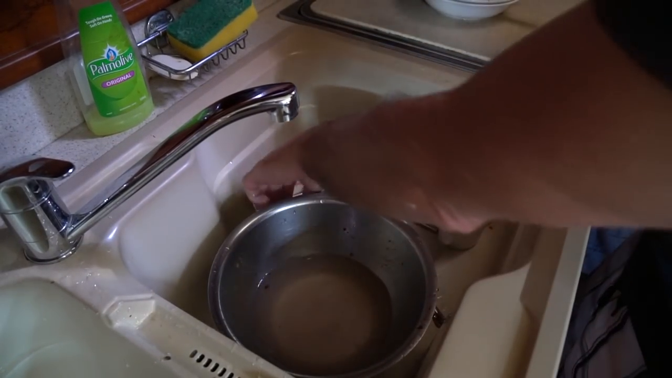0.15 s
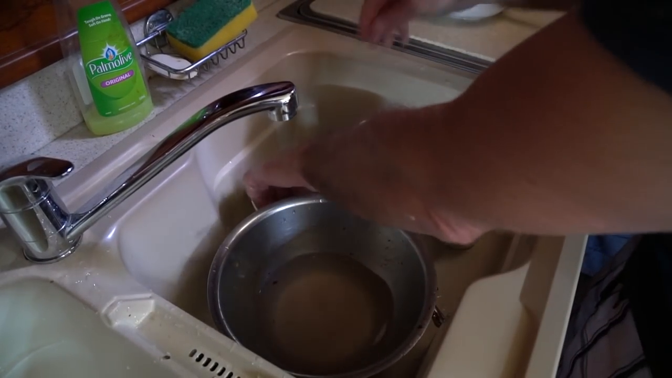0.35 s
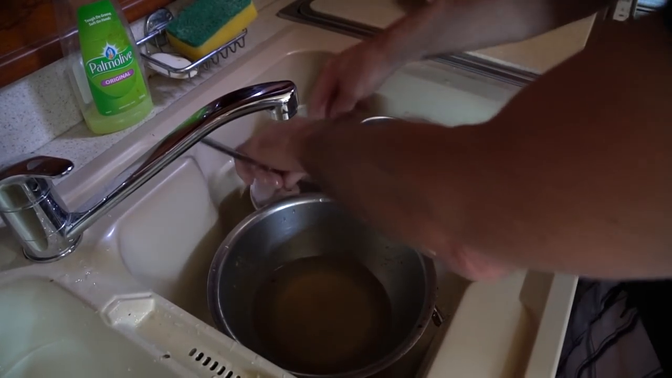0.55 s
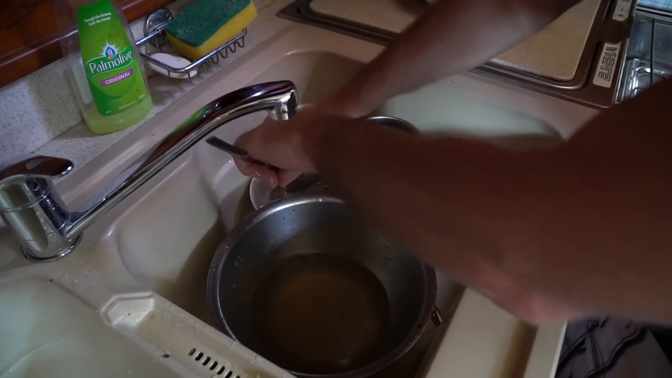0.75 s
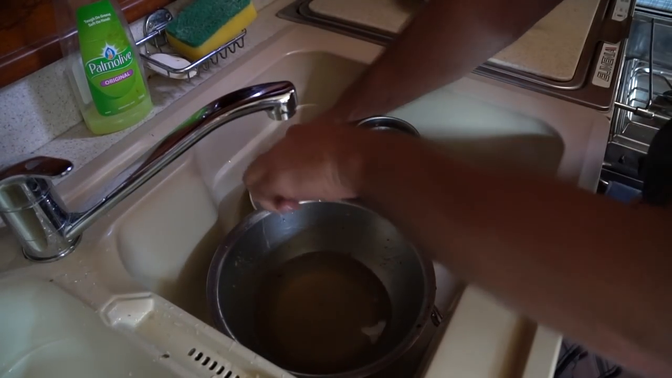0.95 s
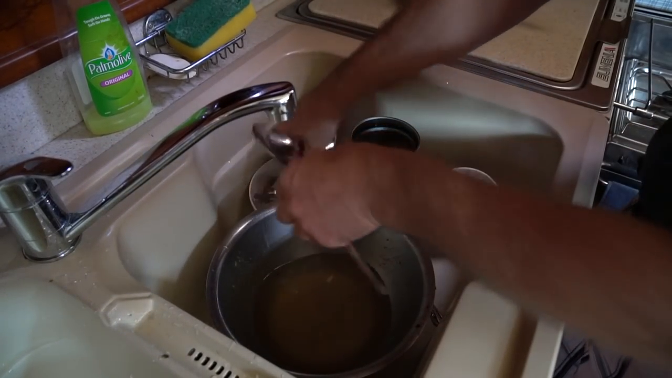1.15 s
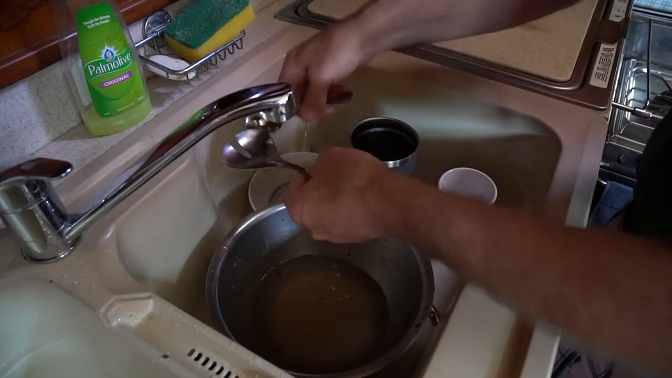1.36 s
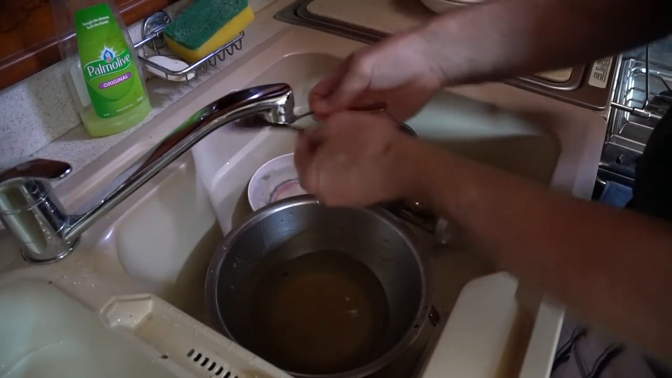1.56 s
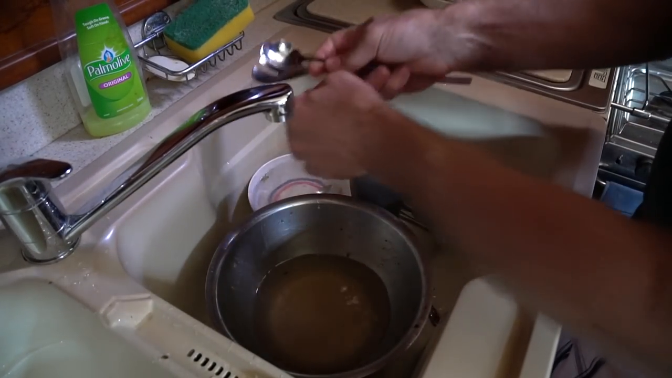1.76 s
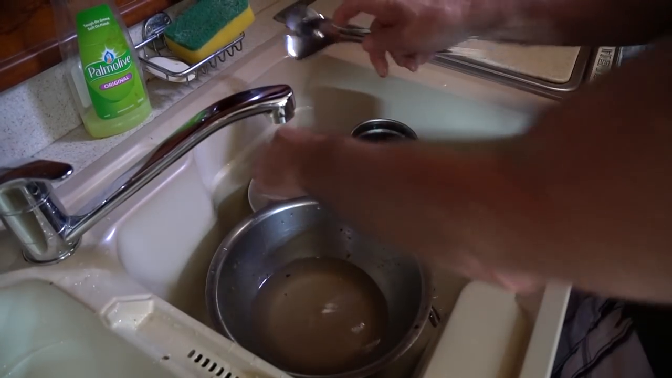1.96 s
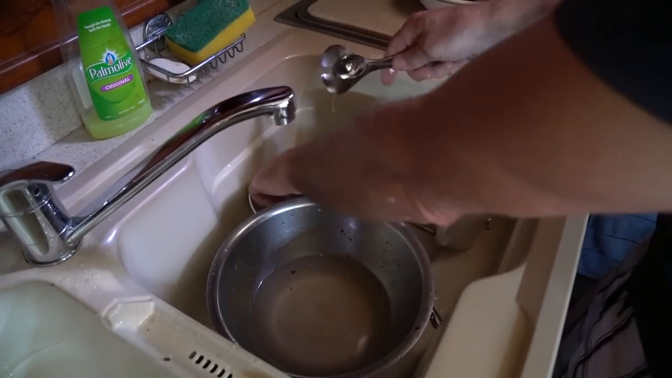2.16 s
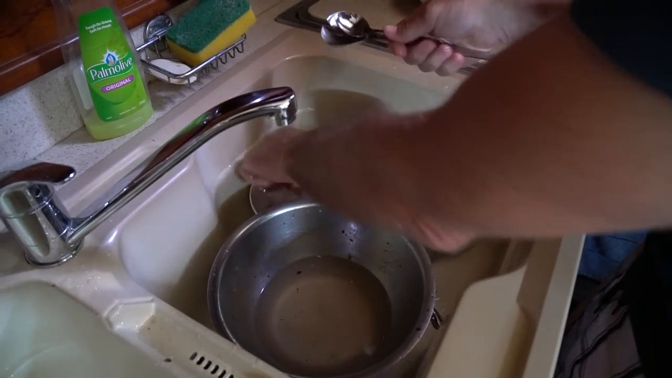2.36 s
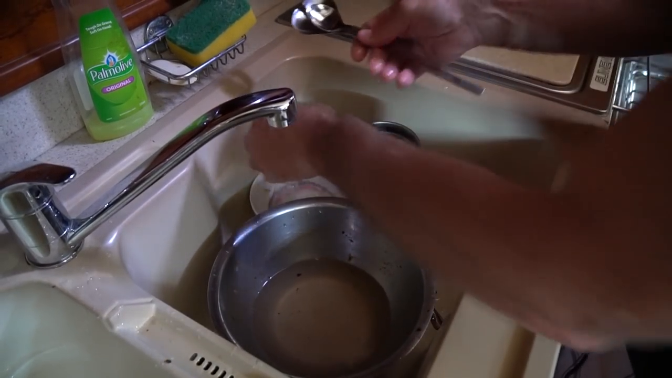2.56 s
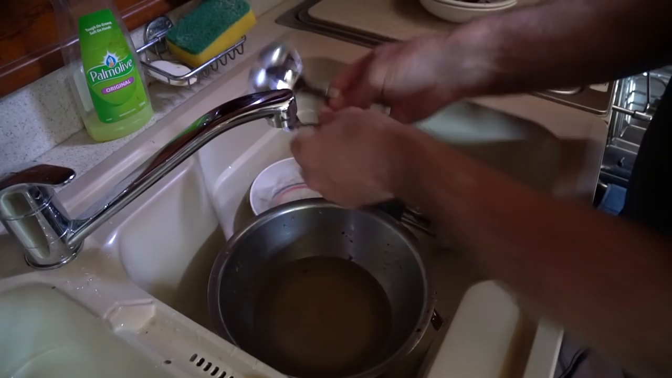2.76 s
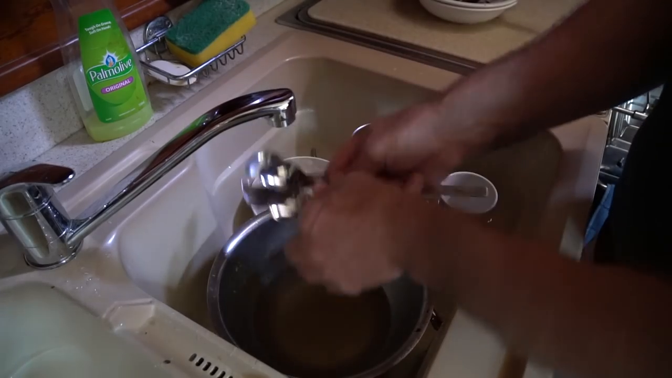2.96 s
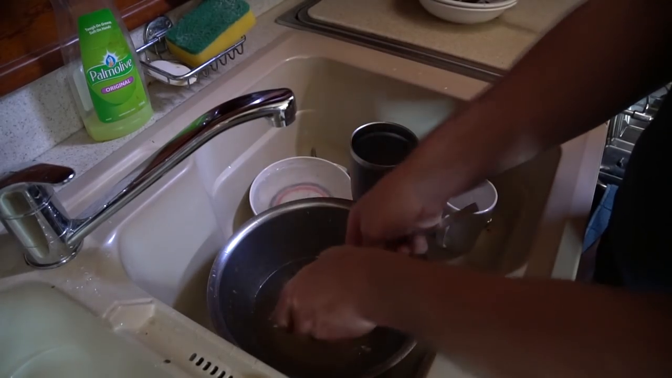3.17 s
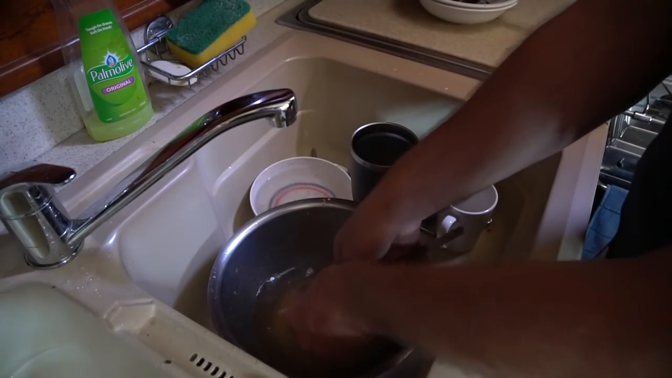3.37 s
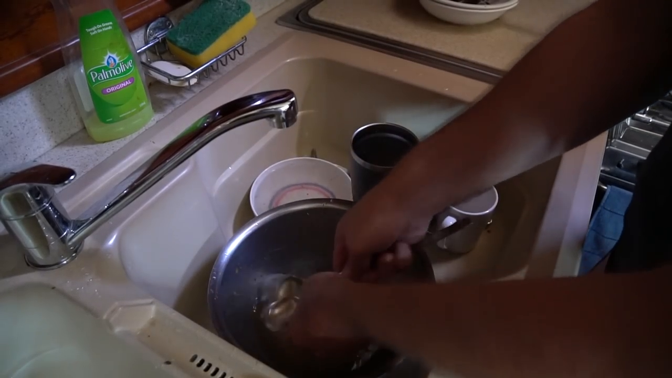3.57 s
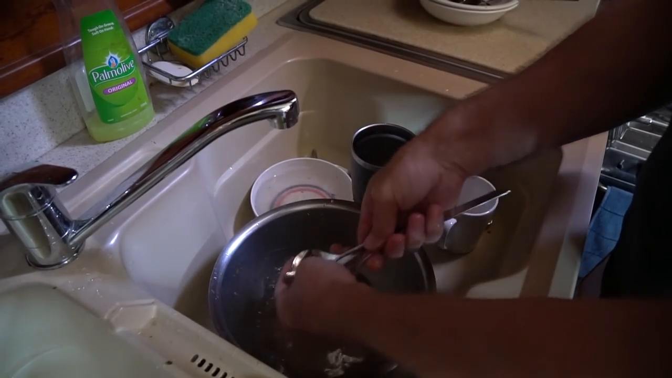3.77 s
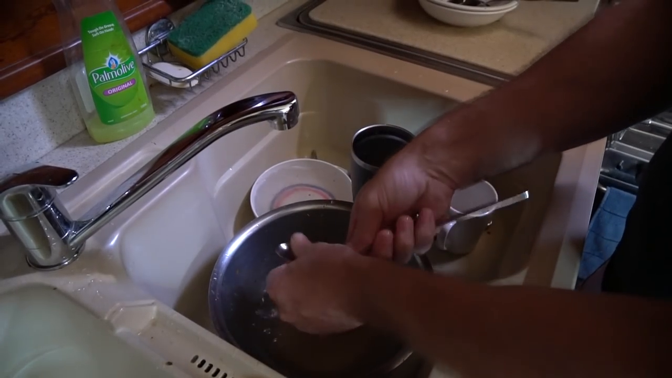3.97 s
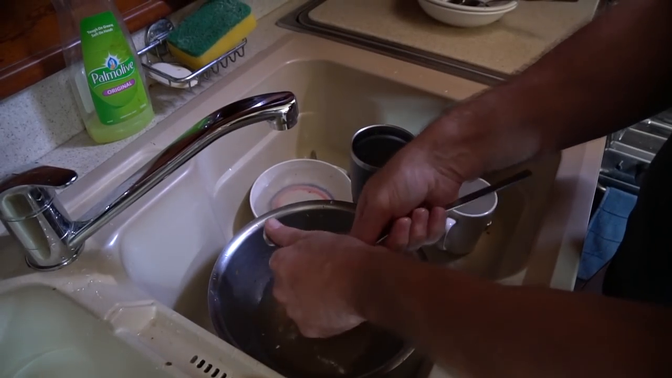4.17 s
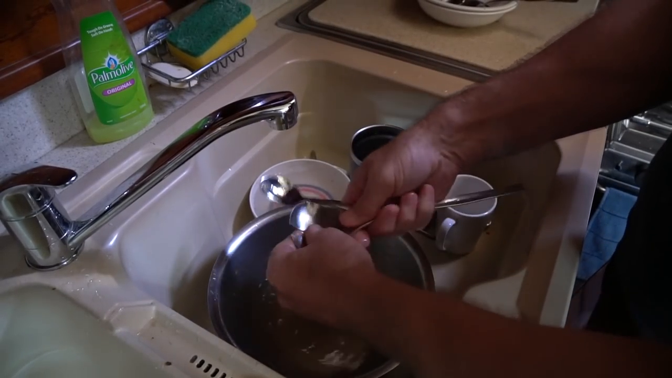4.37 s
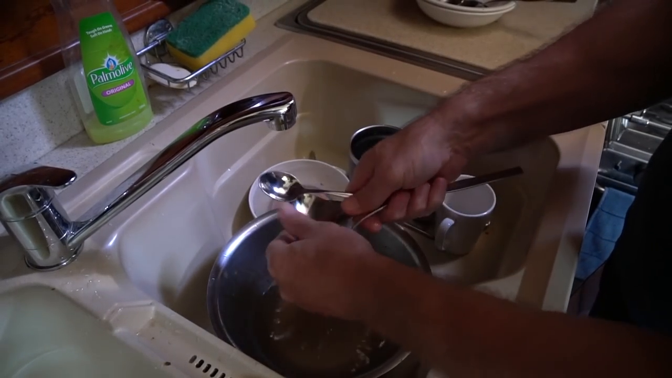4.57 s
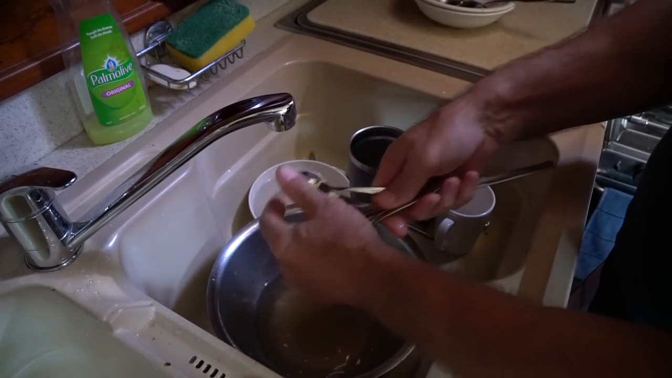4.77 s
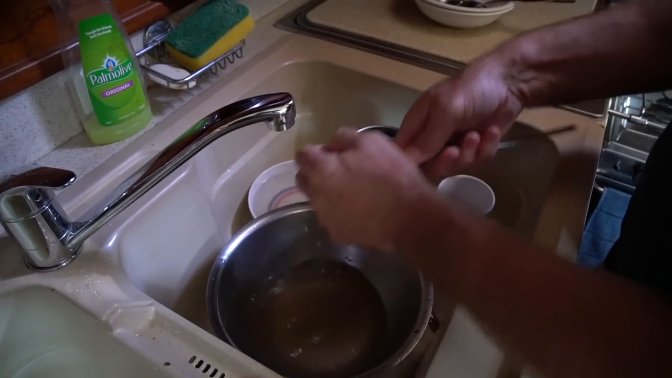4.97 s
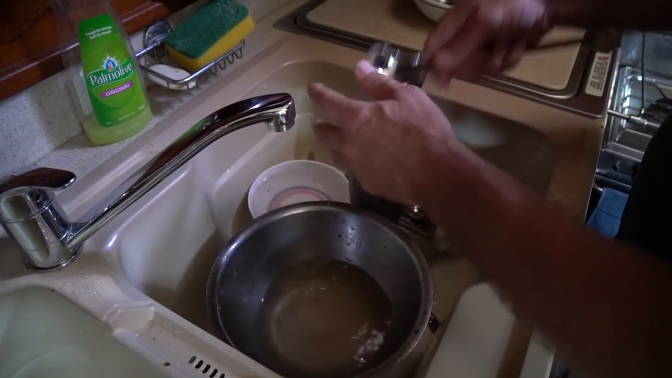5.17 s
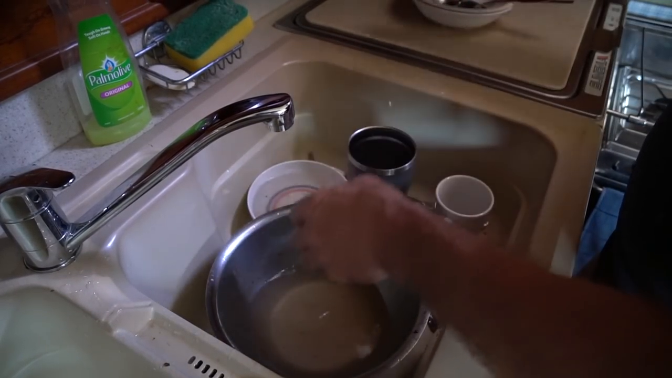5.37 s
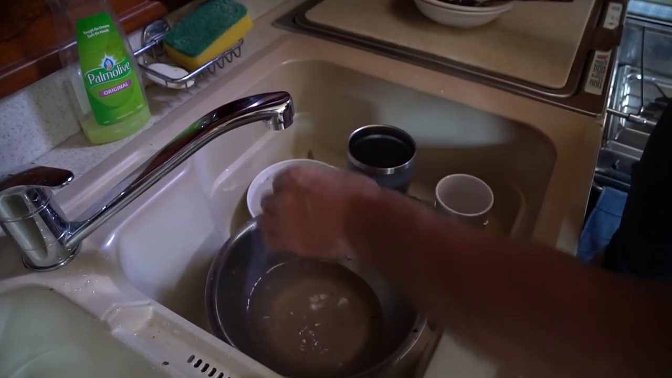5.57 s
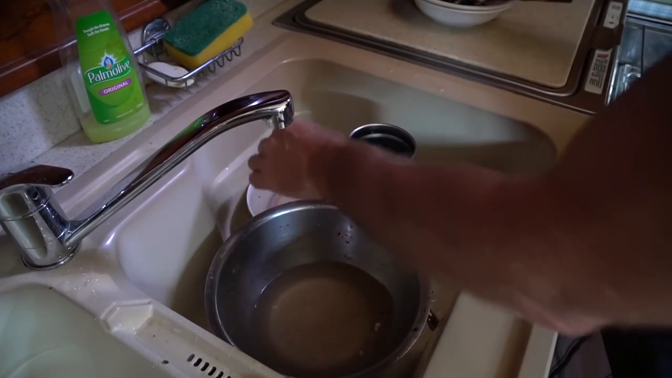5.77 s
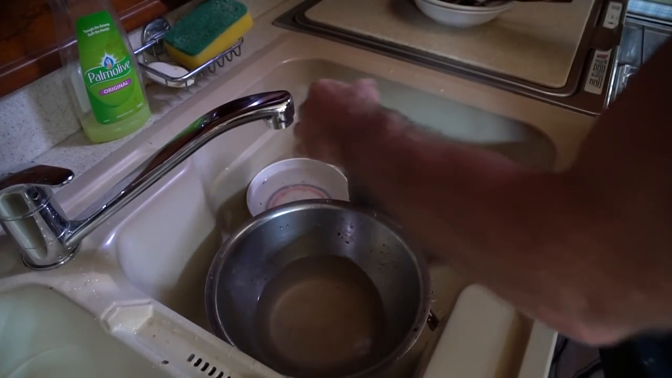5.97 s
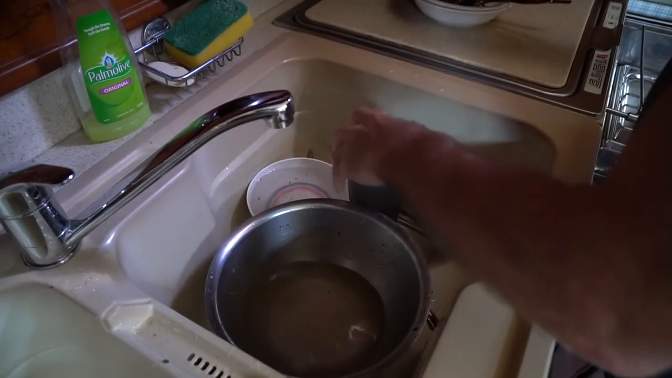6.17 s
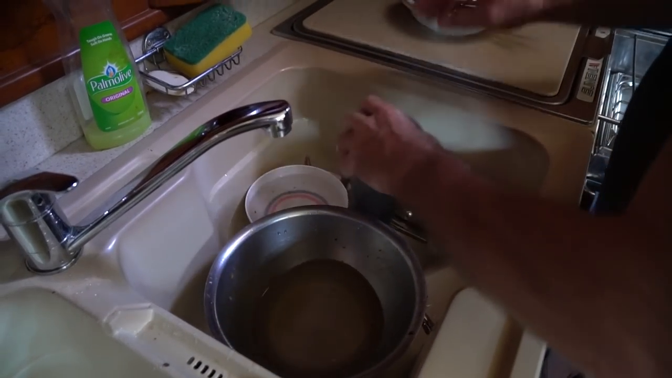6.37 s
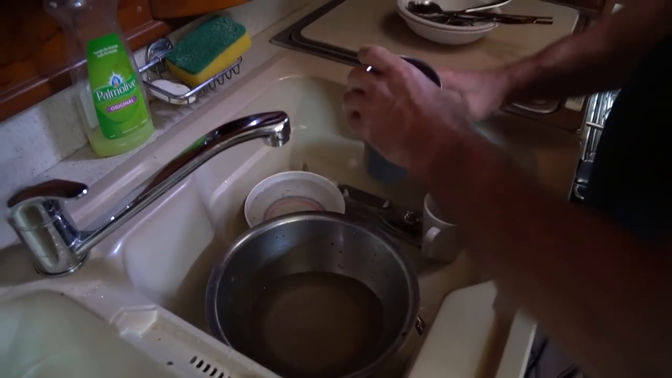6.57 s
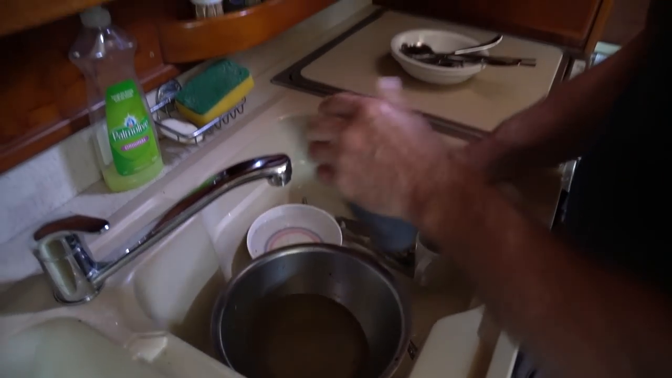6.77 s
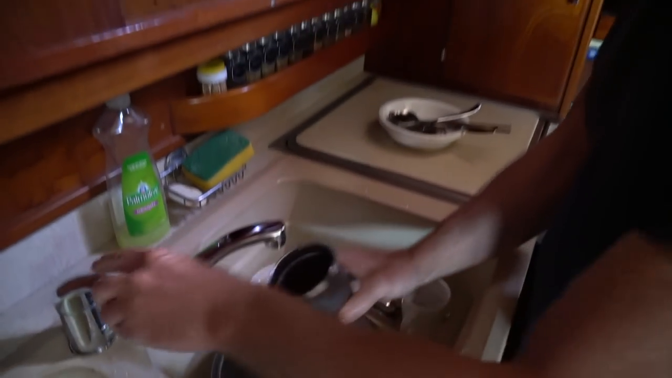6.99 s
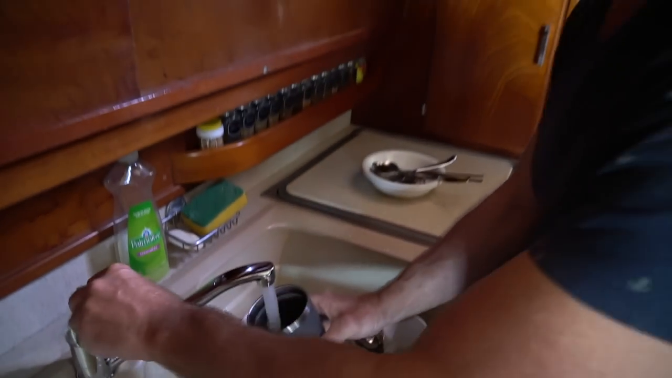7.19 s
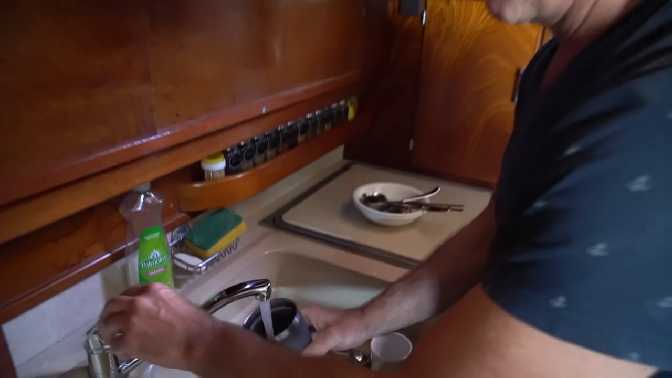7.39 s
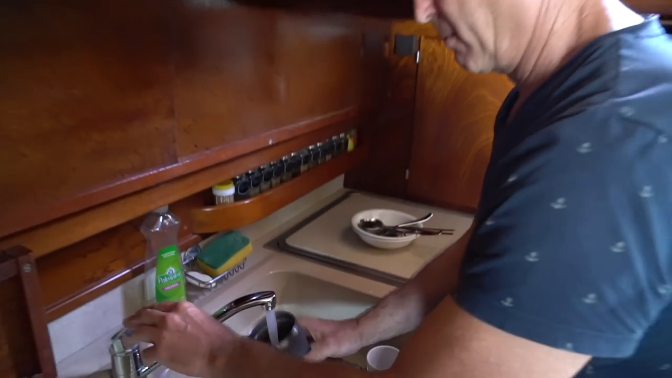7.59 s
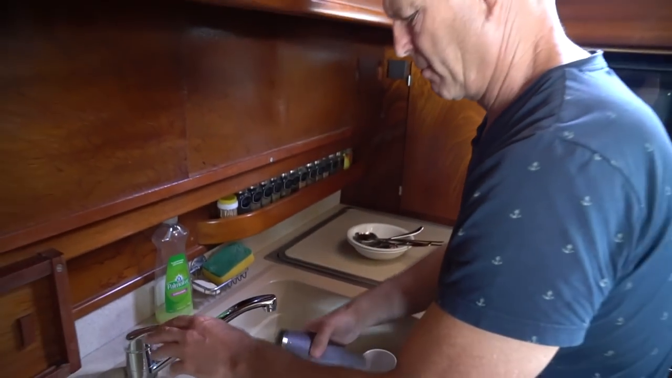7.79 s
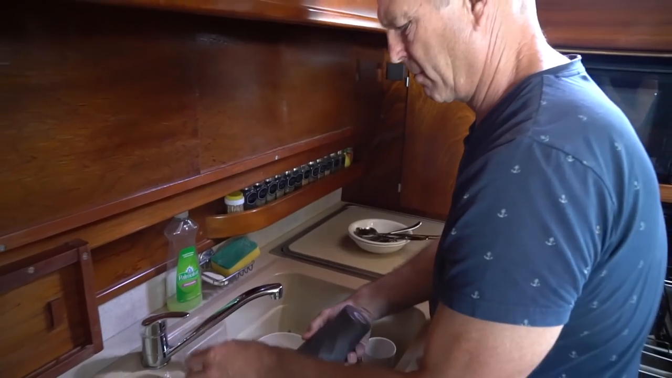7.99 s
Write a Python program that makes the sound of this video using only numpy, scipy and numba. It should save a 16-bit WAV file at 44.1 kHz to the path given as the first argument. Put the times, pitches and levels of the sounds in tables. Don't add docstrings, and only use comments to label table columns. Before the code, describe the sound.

Washing up heard close in stereo over a faint cabin hum. Dull, loud china clacks come first, then sparse high metallic spoon clinks with tiny drips. A short bubbling slosh follows, more wet spoon taps, and a dense clattering slide as cutlery lands on a pile. A mug gives a clear ring, cut off by a hand. After a quiet gap, water runs under a second and stops. Short dry wooden-room echo.

```python
import sys
import numpy as np
from scipy import signal
from scipy.fft import rfft, irfft, next_fast_len
from scipy.io import wavfile
from scipy.ndimage import uniform_filter1d
from numba import njit

SR = 44100
rng = np.random.default_rng(int(sys.argv[2]) if len(sys.argv) > 2 else 0)


def gain_from_db(level_db):
    decades = np.asarray(level_db, float) / 20
    return 10 ** decades


def store_wav(level_fs):
    pcm = np.round(np.clip(np.atleast_2d(level_fs), -1, 1) * 32767)
    wavfile.write(sys.argv[1], SR, pcm.T.astype(np.int16))


N = 354194
T = np.arange(N) / SR

# (lowest [Hz], highest [Hz])
EDGES_HZ = [(4000, 11800), (1600, 4000), (200, 1600)]
# (frequency [Hz], level [dB], t60 [s])
SPOON_MODES = [(2350, -14, .25), (2650, -10, .2), (3300, -10, .12), (3660, -8, .16), (4300, -8, .17),
               (5130, -12, .2), (5400, -12, .15), (6070, -11, .22), (6470, -6, .12), (7050, -8, .22),
               (7235, -7, .2), (7770, 0, .16), (8059, -6, .24), (8930, -11, .25), (9200, -3, .22),
               (9880, -8, .1), (10330, -3, .24), (10460, -6, .28), (11000, -5, .16)]
# (frequency [Hz], level [dB per Hz])
CRACK_COLOUR = [(320, -7.5), (450, -12), (720, -9), (1110, -8), (1310, -12.5), (10600, -9), (11500, -20)]


def unit(x):
    return x / np.sqrt(np.mean(x ** 2))


def colour(x, points):
    hz, db = np.transpose(points)
    size = next_fast_len(x.shape[-1])
    f = np.maximum(np.arange(size // 2 + 1) * SR / size, 1)
    gain = gain_from_db(np.interp(np.log(f), np.log(hz), db))
    return irfft(rfft(x, size) * gain, size)[..., :x.shape[-1]]


def wide_noise(points, size=N):
    # (frequency [Hz], level [dB])
    side_db = [(60, -12), (250, -10), (1000, -7.5), (2000, -5.5), (4000, -3), (10000, -2.5)]
    mid, side = colour(rng.standard_normal((2, size)), points)
    side = colour(side, side_db)
    return unit(np.array([mid + side, mid - side]))


def ring(x, hz, t60):
    r = np.exp(-np.log(1000) / (np.clip(t60, .01, .9) * SR))
    w = 2 * np.pi * hz / SR
    return signal.lfilter([0, r * np.sin(w)], [1, -2 * r * np.cos(w), r * r], x)


def cabin():
    # (frequency [Hz], level [dB per Hz])
    air = [(15, -43), (25, -9), (114, -15), (265, -22.5), (325, -27.5), (3110, -45), (4810, -41.5),
           (10600, -48), (11500, -56.5), (15000, -105)]
    hum = unit(ring(rng.standard_normal(N), 103, 0.25))
    return gain_from_db(-65) * wide_noise(air) + gain_from_db(-59) * hum


def struck(hits, bass_db, slope):
    return [(s, db, weight, bass_db + slope * weight, t60) for s, db, weight, t60 in hits]


def rubbed(curve, middle_db, bass_db, middle_slope, bass_slope):
    return [(s, db, middle_db + middle_slope * (db + 43), bass_db + bass_slope * (db + 43.5))
            for s, db in curve]


def band_db(rows):
    return rows[:, 1] + np.array([0 * rows[:, 1], rows[:, 2], rows[:, 3]])


def rub_gain(rub, t):
    rows = np.array(rub)
    return np.array([gain_from_db(np.interp(t, rows[:, 0], db, -140, -140)) for db in band_db(rows)])


def grit(size, rate, spread_db, t60):
    strength = gain_from_db(spread_db * np.minimum(rng.exponential(size=size), 3))
    blows = (rng.random(size) < rate / SR) * strength
    flicker = signal.lfilter([1], [1, -np.exp(-np.log(1000) / (t60 * SR))], blows)
    return unit(blows) * np.sign(rng.standard_normal(size)), unit(flicker)


def patchy(x):
    z = signal.stft(x, nperseg=512)[2]
    patch_hz, patch_s = 260, .045
    walk = rng.standard_normal(z.shape[1:])
    walk = uniform_filter1d(walk, int(patch_hz * 512 / SR), axis=0)
    walk = uniform_filter1d(walk, int(patch_s * SR / 256), axis=1)
    return signal.istft(z * gain_from_db(3.5 * unit(walk)), nperseg=512)[1][:, :x.shape[1]]


def three_bands(points, modes, size):
    lifts = [(hz * (1 + k * 0.028), (6 + 0.082 * db) * (k == 0)) for hz, db, _ in modes for k in (-1, 0, 1)]
    hiss = colour(wide_noise(points, size), sorted(lifts) or [(1, 0)])
    if modes:
        hiss = patchy(hiss)
    filters = [signal.butter(4, edges, "band", fs=SR, output="sos") for edges in EDGES_HZ]
    return np.array([unit(signal.sosfilt(sos, hiss)) for sos in filters])


@njit
def add(out, at, hz, t60, size):
    for k in range(len(at)):
        z, p = size[k] + 0j, np.exp(2j * np.pi * hz[k] / SR - np.log(1000) / (t60[k] * SR))
        for i in range(at[k], min(len(out), at[k] + int(t60[k] * SR))):
            out[i] += z.imag
            z *= p


def nearest(free_hz, own_hz):
    near = own_hz[np.abs(np.log(free_hz[:, None] / own_hz)).argmin(axis=1)]
    return np.where(np.abs(np.log(free_hz / near)) < .07, near * (free_hz / near) ** .15, free_hz)


def handled(hits, rub, modes, noise, crack_db, clink_db, ring_db, rub_db, sing_db, rise_s, free,
            held_s=9., place_db=4.0):
    rows, (hz, db, t60) = np.array(hits), np.transpose(modes)
    first = int(SR * min(rub[0][0], hits[0][0])) - SR // 100
    last = int(SR * max(rub[-1][0], hits[-1][0])) + SR // 3
    now, t = T[first:last], T[:SR // 3]
    at = (rows[:, 0] * SR).astype(int) - first
    gain, slide = gain_from_db(band_db(rows)), rub_gain(rub, now)
    crack_t60, t60 = np.clip(rows[:, 4], .01, .4), np.clip(free * t60, .02, .9)

    blows, flicker = grit(len(now), 500, 3.0, .05)
    envelope = gain_from_db(rub_db) * slide * flicker
    for i, g, fall in zip(at, gain.T, crack_t60):
        crack = (1 - np.exp(-t / rise_s)) * gain_from_db(-60 * t / fall)
        envelope[:, i:i + len(t)] += gain_from_db(crack_db) * g[:, None] * crack

    band = (hz < EDGES_HZ[0][0]) * 1 + (hz < EDGES_HZ[1][0])
    place = rng.standard_normal((len(at), 2, len(hz)))
    size = gain_from_db(ring_db + db + place_db * place[:, 0]) * gain[band].T
    mode_hz = hz * (1 + 0.0027 * place[:, 1])
    tones = np.zeros(len(now))
    add(tones, at.repeat(len(hz)), mode_hz.ravel(), np.tile(t60, len(at)), size.ravel())
    for f, d, fall, b in zip(hz, db, t60, band):
        tones += gain_from_db(sing_db + d) * ring(slide[b] * blows + 1e-12, f, fall)
    tones *= np.clip((held_s - now) / 0.024, 0, 1)

    for (lo, hi), g in zip(EDGES_HZ, gain):
        u = rng.random((len(at), 4, 16))
        start = at[:, None] + (.014 * SR * u[:, 3]).astype(int)
        size = gain_from_db(clink_db - 26 * u[:, 2]) * g[:, None]
        lowest = max(lo, 520)
        clink_hz = nearest(lowest * (hi / lowest) ** u[:, 0].ravel(), hz)
        clink_t60 = crack_t60[:, None] * (0.3 + 0.55 * u[:, 1])
        add(tones, start.ravel(), clink_hz, clink_t60.ravel(), size.ravel())

    out = np.zeros((2, N))
    out[:, first:last] = (noise[..., :len(now)] * envelope[:, None]).sum(axis=0) + tones
    return out


def china():
    # (time [s], treble peak [dB], weight = middle over treble [dB], crack t60 [s])
    hits = [(0.1131, -31, -17.5, 0.11), (0.1556, -11.5, 2, 0.12), (0.2401, -16, 2.5, 0.17),
            (0.3071, -8.5, -31, 0.1), (0.3251, -8.5, -3.5, 0.038), (0.411, -29, -16, 0.11),
            (0.451, -7, -6.5, 0.24), (0.5334, -6, -14, 0.28), (0.616, -13, -31, 0.19),
            (0.6374, -17, -26, 0.13), (0.7123, -24, 7, 0.16), (0.964, -24, 4.5, 0.1),
            (1.0226, -20, -11.5, 0.48), (1.096, -9, -7.5, 0.15), (1.1418, -9.5, -21, 0.058),
            (1.1692, -12, 6.5, 0.033), (1.2208, 0.5, -5.5, 0.051), (1.274, -14.5, 5, 0.18),
            (1.2994, -9, 5, 0.018)]
    # (time [s], level [dB])
    rub = [(.11, -41.5), (.45, -42), (0.637, -35), (0.851, -75), (.955, -78), (1.05, -44.5), (1.29, -28.5),
           (1.39, -50), (1.56, -72)]
    # (frequency [Hz], level [dB], t60 [s])
    modes = [(255, -28.5, 0.24), (350, -11, 0.13), (557, -15, 0.2), (628, -5, 0.13), (714, 0, 0.15),
             (904, -4, 0.12), (1033, -4, 0.082), (1191, -3, 0.083), (1361, -5, 0.1), (1543, 0, 0.05),
             (2423, -15, 0.3), (2990, -15, 0.4), (3160, -3, 0.08), (3250, -14.5, 0.4), (3650, -6.5, 0.06),
             (3930, -18, 0.4), (4400, -9.5, 0.26), (4470, 6.5, 0.08), (4640, -16, 0.3), (5100, 0, .06),
             (5860, -5.5, .07)]
    # (frequency [Hz], level [dB per Hz])
    body = [(270, -9.5), (460, -18.5), (690, -5), (950, -6), (1170, -13), (2100, -22), (4500, -13),
            (7400, -19), (10600, -17.5), (11500, -38)]
    noise = three_bands(body, modes, size=3 * SR)
    return handled(struck(hits, 0.6, 1.42), rubbed(rub, 6.0, 3.1, -0.27, -0.25), modes, noise,
                   crack_db=-15.0, clink_db=-16.0, ring_db=-29.5, rub_db=-3.5, sing_db=-33.0,
                   rise_s=0.0055, free=0.8)


def pings():
    # (time [s], frequency [Hz], level [dB], t60 [s])
    china_pings = [(0.113, 600, -43, 0.22), (0.1556, 748, -18.5, 0.21), (0.24, 1652, -27.5, 0.1),
                   (0.24, 3386, -27, 0.12), (0.24, 3700, -32, 0.25), (0.24, 4660, -30.5, 0.15),
                   (0.3071, 638, -32, 0.27), (0.3071, 4420, -33.5, 0.19), (0.3251, 612, -27, 0.11),
                   (0.411, 700, -29.5, 0.09), (0.451, 704, -25.5, 0.3), (0.451, 2410, -29, 0.21),
                   (0.451, 3550, -33, 0.1), (0.5334, 3203, -18.5, 0.25), (0.5334, 4510, -28, 0.25),
                   (0.5334, 5787, -25, 0.16), (0.616, 4710, -23, 0.07), (0.6374, 747, -21.5, 0.24),
                   (0.6374, 4527, -21.5, 0.22), (0.6374, 6600, -32, 0.07), (0.6374, 10615, -23, 0.086),
                   (0.7123, 907, -38, 0.11), (0.964, 726, -32.5, 0.09), (1.0226, 2610, -33.5, 0.14),
                   (1.0226, 3700, -32.5, 0.1), (1.0226, 7186, -37.5, 0.07), (1.096, 681, -23.5, 0.21),
                   (1.096, 1530, -22, 0.1), (1.096, 4600, -25.5, 0.13), (1.096, 5738, -29.5, 0.25),
                   (1.1418, 906, -23.5, 0.12), (1.1418, 4340, -31.5, 0.19), (1.1418, 8979, -27, 0.12),
                   (1.1418, 10400, -29.5, 0.11), (1.1692, 900, -20.5, 0.25), (1.1692, 1539, -17, 0.2),
                   (1.1692, 2460, -17.5, 0.13), (1.224, 719, -11.5, 0.25), (1.2795, 910, -27, 0.36),
                   (1.1692, 4070, -20, 0.054), (1.2795, 4900, -23.5, 0.17), (1.2994, 3620, -20.5, 0.19),
                   (1.2994, 3900, -30, 0.14)]
    # (time [s], frequency [Hz], level [dB], t60 [s])
    spoon_pings = [(1.5558, 2853, -28.5, 0.072), (1.5558, 7784, -17, 0.14), (1.5558, 10379, -33, 0.3),
                   (1.575, 7219, -40.5, 0.21), (1.575, 10379, -22.5, 0.36), (1.5885, 7224, -25, 0.1),
                   (1.5885, 7751, -25, 0.033), (1.5885, 10309, -25, 0.23), (1.6941, 7741, -27, 0.14),
                   (1.6941, 3530, -41.5, 0.16), (1.6941, 9210, -18, 0.072), (2.0512, 2767, -24.5, 0.073),
                   (2.0512, 10427, -20, 0.069), (2.1803, 1539, -34, 0.07), (2.2194, 10400, -36, 0.16),
                   (2.2369, 10416, -20.5, 0.038), (2.4514, 8058, -32, 0.09), (2.4514, 9210, -27.5, 0.052),
                   (2.8484, 5103, -37.1, 0.27), (2.8484, 7811, -35, 0.33), (2.8484, 11057, -31.5, 0.06),
                   (2.8775, 3326, -30.5, 0.17), (2.8775, 5194, -44, 0.11), (2.8775, 6481, -29, 0.21),
                   (2.91, 9162, -33, 0.07), (2.91, 10960, -24.5, 0.047), (2.9958, 9205, -23, 0.11),
                   (3.8722, 10976, -33, 0.07), (3.988, 3235, -32, 0.14), (4.2117, 6433, -39, 0.3),
                   (4.2343, 10115, -21.5, 0.066), (4.325, 5221, -26, 0.067), (4.5993, 4403, -36, 0.1),
                   (4.5993, 10933, -32, 0.12), (4.9153, 9226, -28, 0.16), (4.9515, 9189, -18, 0.1),
                   (5.159, 4505, -39, 0.1), (5.402, 5200, -28.5, 0.15), (5.402, 10411, -21.5, 0.11),
                   (5.5151, 6508, -26, 0.27), (5.5151, 9173, -35.5, 0.25), (5.5151, 10217, -17.5, 0.16),
                   (5.5697, 1426, -32.5, 0.33), (5.5697, 3994, -27.5, 0.13), (5.5697, 10922, -26.5, 0.09),
                   (5.6174, 6519, -26, 0.25), (5.6174, 10384, -24.5, 0.14), (5.7052, 9549, -16, 0.072),
                   (5.7052, 10944, -19, 0.053), (5.9691, 9485, -19, 0.057)]
    s, hz, db, t60 = np.transpose(list(china_pings) + list(spoon_pings))
    t60, level_db = np.clip(t60, .02, .5), db - 1.5
    out = np.zeros(N)
    add(out, (s * SR).astype(int), hz, t60, gain_from_db(level_db))
    beside_hz = hz * (1 + 0.0068 * rng.standard_normal(len(s)))
    add(out, ((s + 0.0034) * SR).astype(int), beside_hz, t60, gain_from_db(level_db - 7.5))
    return out


def thuds():
    # (time [s], peak [dB], frequency [Hz])
    knocks = [(.156, -27, 250), (.243, -31, 270), (0.482, -23, 370), (1.95, -36, 266), (2.107, -42, 63.3),
              (3.24, -29, 250), (3.288, -24, 385), (3.322, -28, 255), (3.345, -24, 375), (3.362, -24, 72),
              (4.82, -48, 270), (5.676, -37, 313), (5.878, -35, 301), (5.97, -28, 110), (6.05, -36, 320),
              (6.29, -38, 330), (7.028, -41.5, 58.33), (7.07, -50, 250), (7.661, -22.5, 62),
              (7.665, -36, 200), (7.67, -42, 390), (7.74, -38, 62)]
    out = np.zeros(N)
    for s, db, hz in knocks:
        i = int(s * SR)
        t = T[:min(SR // 2, N - i)]
        envelope = gain_from_db(db - 60 * t / .17) * (1 - np.exp(-t / 0.0033)) ** 2
        out[i:i + len(t)] += envelope * np.sin(2 * np.pi * hz * t)
    return out


def clanks():
    # (time [s], damped at [s], [(frequency [Hz], level [dB])])
    blows = [
        (.712, .97, [(1240, -47), (1970, -53), (2406, -49), (2977, -53), (3203, -49), (3978, -49)]),
        (1.3, 1.57, [(1249, -45), (1497, -50), (1976, -41), (2056, -39), (2207, -43), (2433, -47), (2616, -40), (2982, -41), (3160, -37), (3930, -37), (4037, -40), (4640, -54)]),
        (1.6, 1.71, [(2347, -50), (3666, -47)]),
        (2.25, 2.36, [(1430, -46), (3900, -54)]),
        (3.241, 3.53, [(3000, -40), (2727, -41), (3300, -42)]),
    ]
    touch_s = .03
    out = np.zeros(N)
    for s, until, partials in blows:
        hz, db = np.transpose(partials)
        i, end_s = int(s * SR), until + touch_s
        now = T[i:int(end_s * SR)]
        tones = np.zeros(len(now))
        for detune, share in ((1, 1), (1.004, 0.4)):
            add(tones, np.zeros(len(hz), int), detune * hz, 0.9 + 0 * hz, share * gain_from_db(db))
        out[i:i + len(now)] += tones * np.clip((end_s - now) / touch_s, 0, 1)
    return out


def drops():
    # (time [s], peak [dB], frequency [Hz])
    single = [(1.44, -33, 721), (2.372, -42.5, 1495), (2.38, -33, 2355), (2.19, -33, 690),
              (2.5166, -35, 1446), (2.52, -45, 790), (2.617, -39, 957), (2.7322, -41.5, 2600),
              (3.4955, -38, 2790), (3.555, -28, 1870), (3.5975, -30, 1390), (3.6094, -35, 1037),
              (3.6225, -22.5, 2520), (3.6494, -31, 4700), (3.8253, -21, 3070), (3.8394, -28.5, 3380),
              (7.312, -43, 576), (7.3226, -27, 1560), (7.334, -36, 962), (7.3996, -37.5, 1106),
              (7.426, -26.5, 4170), (7.559, -30.5, 1585), (7.679, -34.5, 570), (7.6989, -32.5, 1674)]
    # (from [s], to [s],
    # lowest [Hz], highest [Hz], level [dB])
    clouds = [(2.37, 2.406, 1238, 3040, -56), (2.694, 2.786, 3010, 7950, -50),
              (3.244, 3.382, 237.3, 295.5, -44.5), (3.26, 3.417, 521, 993, -30.5),
              (3.302, 3.512, 2595, 3450, -30), (3.548, 3.752, 1012, 2580, -41.5),
              (3.553, 3.797, 2590, 5800, -35.5), (3.824, 3.867, 2650, 4520, -30),
              (7.066, 7.249, 599, 1520, -59), (7.295, 7.734, 514, 2240, -42.5),
              (7.299, 7.76, 508, 1790, -45)]
    rows = list(single)
    for s, db, hz in single:
        u = rng.random((4, 3))
        rows += zip(s + 0.022 * u[:, 0], db - 7.5 - 8 * u[:, 1], hz * (1 + 0.155 * (2 * u[:, 2] - .7)))
    for s0, s1, lo, hi, db in clouds:
        u = rng.random((45, 3))
        rows += zip(s0 + (s1 - s0) * u[:, 0], db - 14 * u[:, 1], lo * (hi / lo) ** u[:, 2])
    out, t = np.zeros(N), T[:SR // 12]
    for s, db, hz in rows:
        i = int(s * SR)
        chirp = np.sin(2 * np.pi * hz * t * (1 + 0.00279 * hz * t))
        envelope = np.exp(-t * hz / 11) * (1 - np.exp(-t / 0.00034))
        out[i:i + len(t)] += gain_from_db(db) * chirp * envelope
    return out


def steel_noise():
    return three_bands(CRACK_COLOUR, [*SPOON_MODES, (1105, 32, 0), (1406, 0, 0)], size=3 * SR)


def spoons(steel):
    # (time [s], treble peak [dB], weight = middle over treble [dB], crack t60 [s])
    contacts = [(1.5558, -12, -26, 0.05), (1.5885, -19, -33, 0.13), (1.6941, -20, -38, 0.15),
                (1.948, -32.5, 5, 0.22), (2.0512, -11.5, -23, 0.12), (2.1427, -29.5, -3.5, 0.079),
                (2.1803, -41.5, 22.5, 0.12), (2.2194, -18, -25, 0.11), (2.2369, -1, -28, 0.013),
                (2.3734, -50, 24, 0.029), (2.4179, -32.5, -22, 0.054), (2.4514, -19, -20, 0.13),
                (2.491, -21.5, -7.5, 0.063), (2.5838, -20.5, -11, 0.015), (2.6613, -39.5, -12, 0.056),
                (2.8001, -15, -21.5, 0.22), (2.8484, -14, -23, 0.066), (2.8775, -11, -13, 0.15),
                (2.91, -15.5, -19, 0.059), (2.9958, -6.5, -18.5, 0.048)]
    # (time [s], level [dB])
    curve = [(1.55, -41), (1.84, -61.5), (2.28, -54), (3.15, -68.5)]
    hits, rub = struck(contacts, -24.0, 1.87), rubbed(curve, 4.0, 0.97, 0.26, 0.25)
    loose = handled(hits[:3], rub[:2], SPOON_MODES, steel, crack_db=-6.5, clink_db=-16.5, ring_db=-34,
                    rub_db=-10.5, sing_db=-33.5, rise_s=0.0014, free=0.93, place_db=-6.5)
    gripped = handled(hits[3:], rub[1:], SPOON_MODES, steel, crack_db=-11.0, clink_db=-23.5, ring_db=-60.0,
                      rub_db=-6.0, sing_db=-57.0, rise_s=0.0012, free=0.52)
    return loose + gripped


def rinse(steel):
    # (time [s], treble peak [dB], weight = middle over treble [dB], crack t60 [s])
    rinse_hits = [(3.2086, -31, -40, 0.072), (3.2335, -14.5, -14.5, 0.37), (3.27, -17, -9, 0.24),
                  (3.5533, -16, -11, 0.044), (3.7144, -39, -1, 0.057), (3.792, -16.5, -13.5, 0.035),
                  (3.8722, -11.5, -15.5, 0.17), (3.988, -21.5, -4.5, 0.068), (4.0492, -29.5, 3, 0.042),
                  (4.0759, -30.5, -4, 0.045)]
    # (time [s], treble peak [dB], crack t60 [s])
    wipe_hits = [(4.2118, -18.5, 0.083), (4.2341, -14, 0.07), (4.304, -17, 0.12), (4.3466, -11, 0.045),
                 (4.377, -12.5, 0.1), (4.4546, -14, 0.027), (4.5125, -25, 0.047), (4.5983, -23.5, 0.14),
                 (4.6805, -12, 0.057), (4.724, -10, 0.066), (4.9154, -14.5, 0.24), (4.9495, -14.5, 0.094),
                 (4.9952, -15, 0.065), (5.0945, -13, 0.036), (5.159, -26.5, 0.035)]
    # (time [s], level [dB])
    splash = [(3.15, -64), (3.27, -42.5), (3.42, -48.5), (3.75, -56.5), (4.14, -61)]
    # (time [s], level [dB])
    wipe = [(4.15, -72), (4.36, -40), (4.55, -70), (4.88, -45.5), (5.35, -69.5)]
    wiped = [(s, db, -16.5, t60) for s, db, t60 in wipe_hits]
    hits = struck([*rinse_hits, *wiped], -60, 3.6)
    rub = rubbed(splash, 15.0, 12.0, 1.0, 2.14) + rubbed(wipe, -7.0, -20.5, -0.062, -0.19)
    return handled(hits, rub, SPOON_MODES, steel, crack_db=-6.5, clink_db=-16.5, ring_db=-46.5,
                   rub_db=-2.2, sing_db=-41.0, rise_s=0.0017, free=0.66)


def pile(steel):
    # (time [s], treble peak [dB], weight = middle over treble [dB], crack t60 [s])
    hits = [(5.402, -14.5, -16, 0.51), (5.4675, -18, -14, 0.068), (5.5151, -15, -16, 0.33),
            (5.5697, -7, -12.5, 0.17), (5.6174, -12.5, -9, 0.2), (5.7052, -10, -18, 0.16),
            (5.7545, -11, -8.5, 0.16), (5.8192, -33, -21.5, 0.04), (5.875, -10, -10, 0.18),
            (5.9691, -2, -9, 0.055), (5.9997, -4.5, -28.5, 0.15), (6.041, -23, -14, 0.035)]
    # (time [s], level [dB])
    rub = [(5.398, -50), (5.56, -48), (5.58, -29.5), (5.779, -25), (5.866, -42), (5.878, -21.5),
           (5.96, -31), (6.052, -19.5), (6.27, -74.5)]
    return handled(struck(hits, -2.5, 7.1), rubbed(rub, -8.0, -13, 0.027, 0.077), SPOON_MODES, steel,
                   crack_db=-12.5, clink_db=-16.5, ring_db=-44.5, rub_db=-2.5, sing_db=-58.0,
                   rise_s=0.0041, free=0.76)


def mug(steel):
    # (time [s], treble peak [dB], weight = middle over treble [dB], crack t60 [s])
    hits = [
        (6.291, -39.5, -1, 0.44),
        (6.3444, -15.5, -9.5, 0.036),
    ]
    # (time [s], level [dB])
    rub = [(6.284, -41), (6.292, -47), (6.336, -23.5), (6.53, -80.5), (6.63, -67), (6.7, -74),
           (6.745, -76.5), (6.753, -51), (6.85, -88.5)]
    # (frequency [Hz], level [dB], t60 [s])
    modes = [(700, 2, .3), (1163, 1, .65), (1346, 4, .3), (1432, 7, .5), (1497, -1, .25), (1852, -8, .2),
             (2202, -7, .8), (2659, 6, .17), (3171, -4, .2), (3660, 4, .14), (4183, -12, .18),
             (5141, -12, .14), (6821, -9, .13), (7634, -11, .13)]
    return handled(struck(hits, -2.0, 0.79), rubbed(rub, 2.8, -2.5, -0.05, -0.25), modes, steel,
                   crack_db=-37, clink_db=-8.5, ring_db=-21.5, rub_db=-14.0, sing_db=-42.0,
                   rise_s=0.0027, free=1.0, held_s=6.665, place_db=1.5)


def tap():
    # (time [s], level [dB])
    flow = [(7.065, -84), (7.107, -73.5), (7.145, -44), (7.62, -40), (7.72, -42), (7.79, -55), (7.9, -62.5),
            (7.92, -62), (8.03, -76.5)]
    now = T[7 * SR:]
    fill_db_per_s = 22
    stream = [(s, db, -5.5, -22 + fill_db_per_s * (s - flow[1][0])) for s, db in flow]
    fizz = rub_gain(stream, now) * grit(len(now), 2400, 6.9, 0.053)[1]
    noise = three_bands([(420, -16), *CRACK_COLOUR[2:]], [], size=len(now))
    out = np.zeros((2, N))
    out[:, 7 * SR:] = (noise * fizz[:, None]).sum(axis=0)
    return out


def pump():
    # (time [s], level [dB])
    load = [
        (7.38, -71),
        (7.45, -56),
        (7.64, -43.5),
        (7.68, -66),
    ]
    db = np.interp(T, *np.transpose(load), -140, -140)
    hz = 135 - 0.2 * (db - db.max())
    return gain_from_db(db) * np.sin(2 * np.pi * np.cumsum(hz) / SR)


def walls(x, t60, wet_db):
    t = T[:SR // 4]
    tail = wide_noise([(100, 0.82), (10000, -0.82)], size=len(t)) * gain_from_db(-60. * t / t60) * (t > .0015)
    return signal.oaconvolve(x, gain_from_db(wet_db) * unit(tail) / np.sqrt(len(t)), axes=1)[:, :N]


def scene():
    steel = steel_noise()
    near = china() + pings() + clanks() + drops() + spoons(steel) + rinse(steel)
    near += pile(steel) + mug(steel) + tap()
    near = signal.sosfilt(signal.butter(3, 185, "high", fs=SR, output="sos"), near)
    left_right = gain_from_db([[.8], [-.8]])
    return (near + walls(near, 0.15, -3.5)) * left_right + thuds() + pump() + cabin()


def top_cut(x):
    return signal.sosfilt(signal.butter(12, 12410, fs=SR, output="sos"), x)


def record(dry):
    soft = np.tanh(1.287 * dry) / 1.399
    finished = signal.sosfilt(signal.ellip(8, .2, 60, 11050, fs=SR, output="sos"), soft)
    return top_cut(finished)


dry = scene()
out = record(dry)
store_wav(out)
```